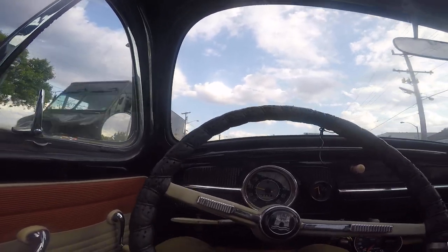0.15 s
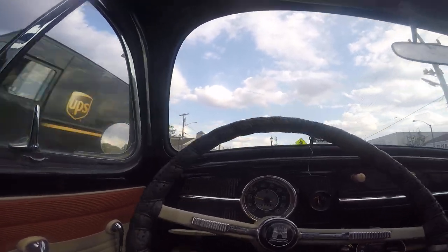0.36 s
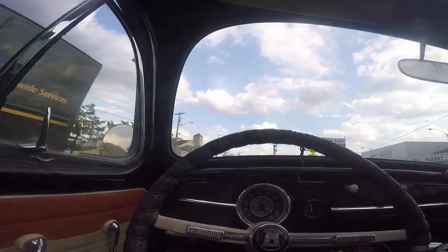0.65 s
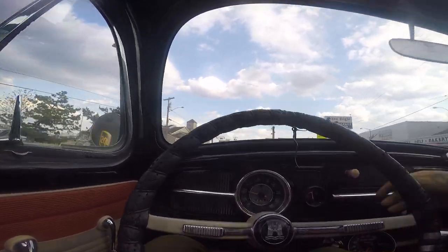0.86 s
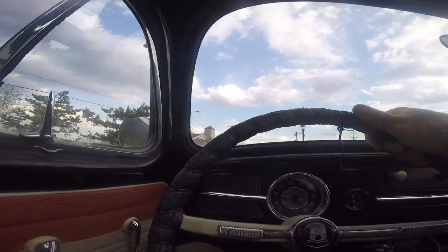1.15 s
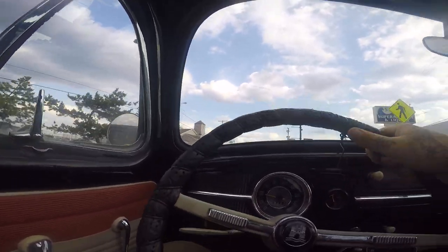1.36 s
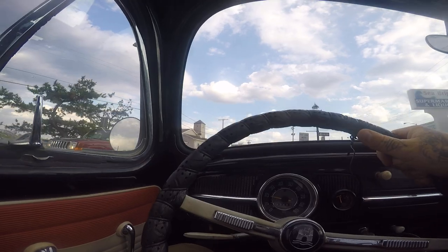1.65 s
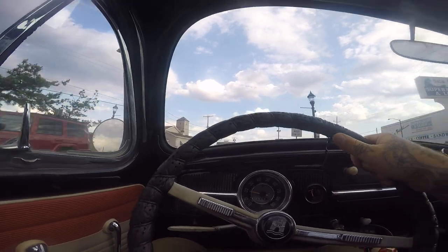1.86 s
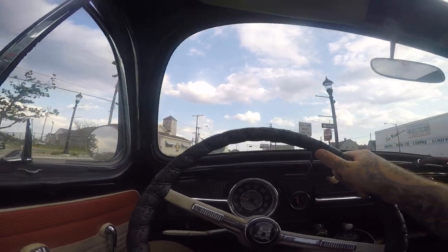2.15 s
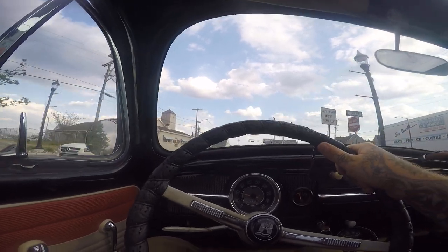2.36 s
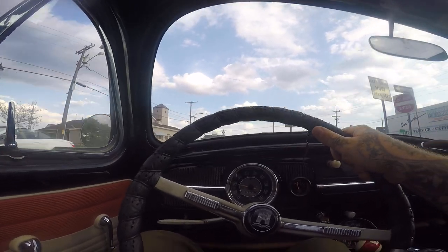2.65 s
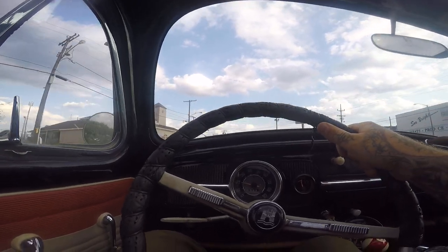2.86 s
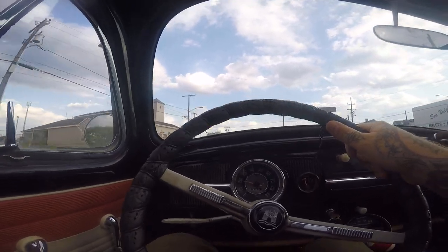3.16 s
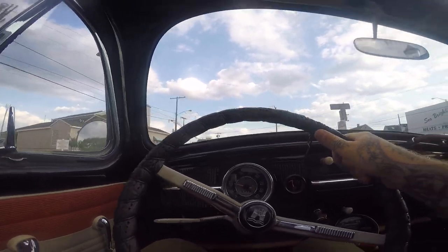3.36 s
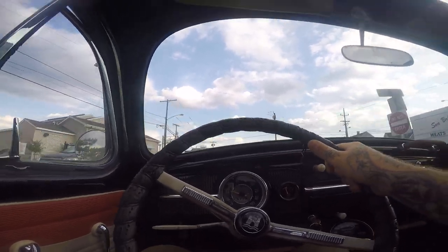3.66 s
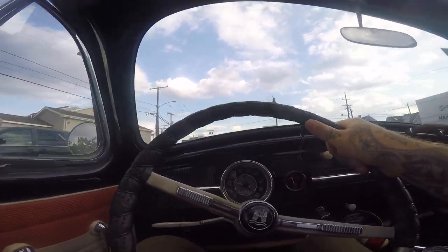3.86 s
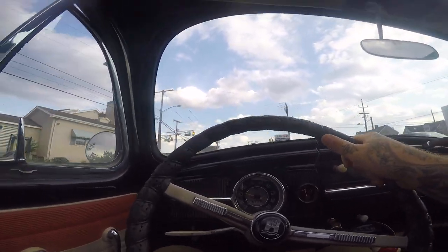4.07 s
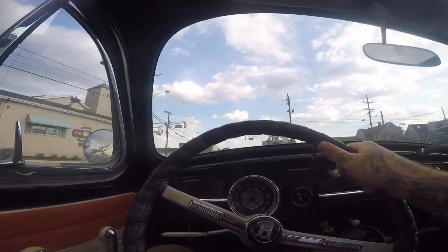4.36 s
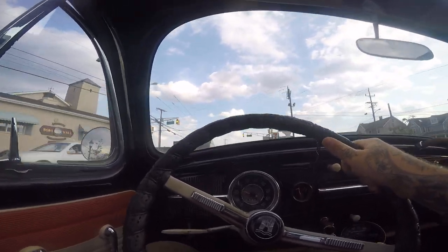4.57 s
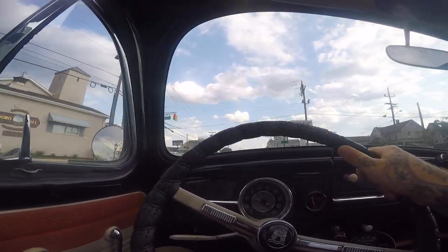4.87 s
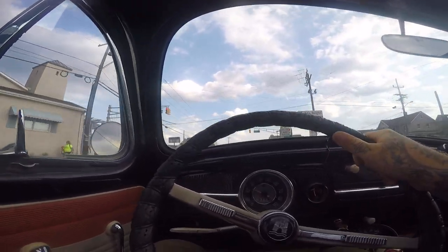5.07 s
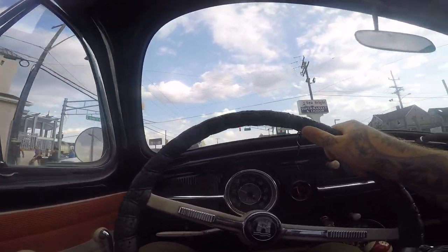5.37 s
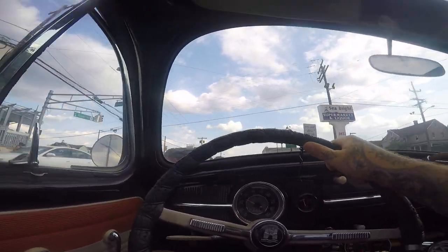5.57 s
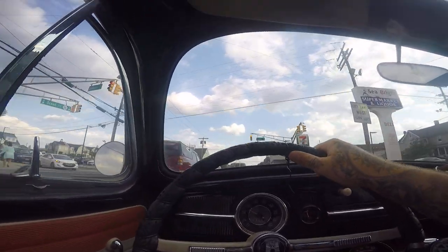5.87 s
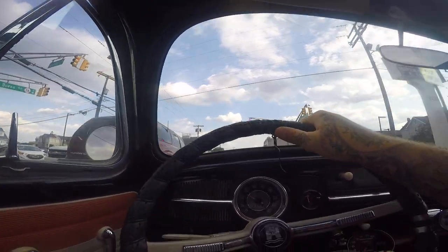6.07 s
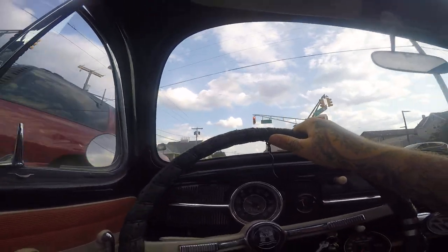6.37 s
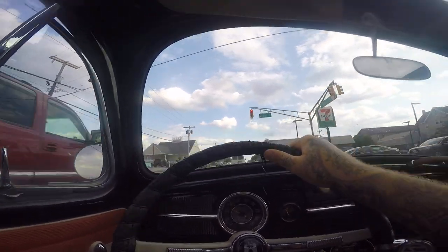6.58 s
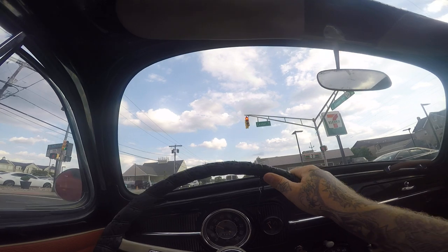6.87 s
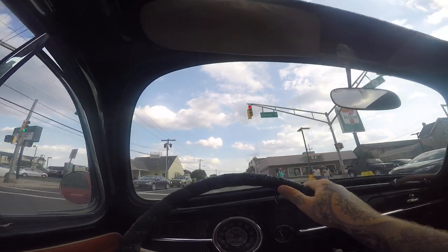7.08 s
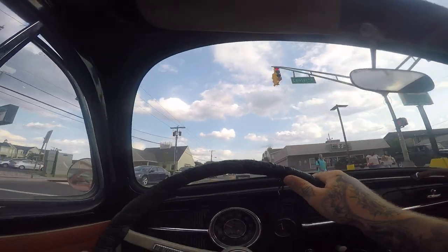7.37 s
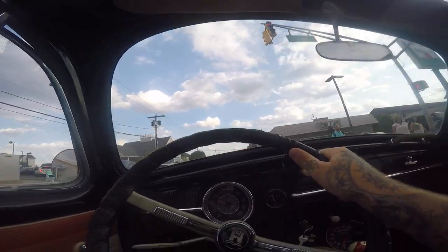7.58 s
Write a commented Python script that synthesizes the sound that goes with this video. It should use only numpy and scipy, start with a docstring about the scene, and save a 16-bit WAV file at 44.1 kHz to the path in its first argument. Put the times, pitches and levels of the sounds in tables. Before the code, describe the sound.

From inside the cabin of an old car driving down a street, a throbbing engine drops in pitch, then slowly gathers speed and eases off again. Tyre noise, a rushing fan and light valve ticking run underneath, while loose metal parts rattle here and there. Toward the end the car hits a rough patch, and the body knocks and clatters loudly over a swell of rumble.

```python
"""Inside an old air-cooled car

The revs of a flat-four engine sag, then it pulls gently along a street. Four unequal exhaust pulses
make a loping harmonic series that booms in the cabin's air resonances, over road rumble, fan rush,
valve ticks and gear whine. Impacts ring loose fittings and the body shell, dry friction squeals
thinly, and near the end a hard bump shakes the whole car."""
import sys
import numpy as np
from scipy import signal
from scipy.fft import rfft, irfft
from scipy.io import wavfile
from scipy.ndimage import uniform_filter1d

SR = 44100
rng = np.random.default_rng(int(sys.argv[2]) if len(sys.argv) > 2 else 0)


def digitize_waveform(pressure):
    """Quantize a signal to 16-bit integers and store it at the path in sys.argv[1].

    Rows of a 2-D input are taken as channels; values are limited to [-1, 1].
    """
    field = np.atleast_2d(pressure).T
    bounded = np.clip(field, -1, 1)
    quanta = np.round(bounded * 32767).astype(np.int16)
    wavfile.write(sys.argv[1], SR, quanta)


N = 340893
TIME = np.arange(N) / SR

# exhaust pulses in firing order: relative level/dB
PULSE_DB = [2.5, 4, -3, -16]
# cabin and panel resonances that colour fan and tyre noise: f/Hz, width/Hz, lift/dB
CABIN_MODES = [(376, 20, -3.5), (434, 50, 5), (691, 45, 5), (801, 125, 5), (947, 31, -6.5), (1418, 64, 7.5),
               (1785, 330, 10.5), (2293, 107, 6), (3550, 140, 2), (4484, 190, 5), (5510, 420, 7),
               (6660, 180, 8.5), (8020, 450, 5.5), (9800, 31, 11), (11500, 36, -2)]


def undb(db):
    """Amplitude ratio of a level in decibels."""
    return 10 ** (np.asarray(db) / 20)


def unit(x):
    """Normalisation to rms 1."""
    return x / np.sqrt(np.mean(x ** 2))


def curve(points):
    """Linear interpolation of (t/s, value) points at every sample."""
    return np.interp(TIME, *np.transpose(points))


def wander(rate):
    """Smooth random fluctuation of rms 1 that changes about rate times a second."""
    step = max(int(SR / rate), 2)
    stairs = np.repeat(rng.standard_normal(N // step + 1), step)
    return unit(uniform_filter1d(stairs, step)[:N])


def grains(rate, scatter_db):
    """Shot noise of rms 1: about rate impulses a second, of uneven size."""
    size = undb(scatter_db * (2 * rng.random(N) - 1)) * np.sign(rng.standard_normal(N))
    return unit(size * (rng.random(N) < rate / SR))


def burst(start, length, fade, rise=0.0012):
    """Envelope of a transient: linear rise, hold and exponential decay, all times in seconds."""
    out = np.zeros(N)
    near = slice(int(start * SR), int((start + length + 10 * fade) * SR))
    age = TIME[near] - start
    out[near] = np.minimum(age / rise, 1) * np.exp(-np.maximum(age - length, 0) / fade)
    return out


def oscillator(hz):
    """Sinusoid whose phase is the integral of its instantaneous frequency."""
    return np.sin(2 * np.pi * np.cumsum(hz) / SR)


def resonance(hz, centre_hz, width_hz, lift_db):
    """Lorentzian resonance: lift/dB and phase lag/rad relative to its centre."""
    detune = 2 * (hz - centre_hz) / width_hz
    return lift_db / (1 + detune ** 2), np.arctan(detune)


def colour(x, points, modes=(), size=8192):
    """Minimum-phase filter: resonances on a broad spectrum; white noise keeps its power."""
    f = np.maximum(np.arange(size // 2 + 1) * SR / size, 1)
    hz, db = np.transpose(points)
    octaves_outside = np.maximum(np.log2(f / hz[-1]), 0) + np.maximum(np.log2(hz[0] / f), 0)
    db = np.interp(np.log(f), np.log(hz), db) - 20 * octaves_outside
    for mode in modes:
        db = db + resonance(f, *mode)[0]
    cepstrum = irfft(np.log(undb(db)))[:size // 2]
    cepstrum[0] /= 2
    response = irfft(np.exp(2 * rfft(cepstrum, size)))
    return signal.fftconvolve(x, response / np.linalg.norm(response))[:N]


def ring(start, modes, tilt_db=0, rise=0.0028):
    """Free decay of damped modes after one blow, tilted by tilt_db per octave about 100 Hz."""
    out = np.zeros(N)
    near = slice(int(start * SR), int((start + .5) * SR))
    age = TIME[near] - start
    for hz, db, t60 in modes:
        envelope = (1 - np.exp(-age / rise)) * np.exp(-np.log(1000) * age / t60)
        out[near] += undb(db + tilt_db * np.log2(hz / 100)) * envelope * np.sin(2 * np.pi * hz * age)
    return out


def bump(start=6.89, hold=0.29, rise=0.18, fall=0.072):
    """Excitation, 0 to 1, as both axles cross a rough patch: exponential rise, hold and decay."""
    return np.exp(np.minimum(TIME - start, 0) / rise - np.maximum(TIME - start - hold, 0) / fall)


def road(rumble_lift_db, roar_db):
    """Random excitation by the road surface: the floor rumbles and the tyres roar grittily."""
    # floor rumble as the road's roughness varies: t/s, level/dB
    roughness = [(0, -25), (.55, -28), (.95, -29.5), (1.3, -31.5), (1.9, -30), (2.7, -27), (4.5, -26),
                 (4.9, -23.5), (5.3, -23.5), (5.6, -26), (5.85, -28.5), (6.25, -31.5), (6.6, -26.5),
                 (7.73, -27.5)]
    # spectra of floor and tyres: f/Hz, relative level/dB
    floor_spectrum = [(8, -1), (25, -3), (43, 3), (60, -3), (77, -8), (95, -9), (130, -17.5), (180, -12),
                      (240, -18), (300, -29.5), (600, -54.5)]
    tyre_spectrum = [(180, -14), (300, 6), (420, 3.5), (600, 2), (800, -3), (1060, 1.5), (1260, -12.5),
                     (1500, -17), (2500, -37.5)]
    rumble = unit(colour(rng.standard_normal(N), floor_spectrum))
    grit = rng.standard_normal(N) + 0.75 * grains(1400, scatter_db=7.6)
    roar = unit(colour(grit, tyre_spectrum, CABIN_MODES))
    return rumble * undb(curve(roughness) + rumble_lift_db) + roar * undb(roar_db + 1.2 * wander(20))


def fan_and_valves(cycle, tick_share=0.38, tick_decay=0.62, throb=0.047):
    """Amplitude-modulated noise: the cooling fan's rush with eight valve ticks in each cycle."""
    # spectrum of fan and valves: f/Hz, relative level/dB
    spectrum = [(1100, -8), (1450, -2.5), (2100, -0.5), (2750, 3), (3100, -3.5), (3700, 1.5), (4500, -5),
                (5000, -14.5), (6800, -15.5), (8600, -23.5), (10000, -22.5), (12500, -27), (15000, -27)]
    tick_phase = 2 * len(PULSE_DB) * cycle % 1  # two valves to a cylinder
    force = undb(3 * wander(130))
    ticks = unit(np.exp(-tick_phase / tick_decay) * force * rng.standard_normal(N))
    pulsation = 1 + throb * np.cos(2 * np.pi * (cycle - .15))
    rush = (rng.standard_normal(N) + tick_share * ticks) * pulsation
    return unit(colour(rush, spectrum, CABIN_MODES)) * undb(.5 * wander(14))


def gears(cycle, cycle_hz, mesh_order=48.5, level_db=-62.5, spread_hz=18):
    """Tooth meshing whines at a multiple of the cycle rate and swells in a panel resonance."""
    mesh_cycles = mesh_order * cycle + np.cumsum(spread_hz * wander(60)) / SR
    lift_db, _ = resonance(mesh_order * cycle_hz, centre_hz=835, width_hz=99, lift_db=12)
    return np.sqrt(2) * undb(level_db + lift_db + 2 * wander(25.93)) * np.sin(2 * np.pi * mesh_cycles)


def squeaks(squeal_spread_hz=120, chirp_spread_hz=500, sag_hz=150, sag_s=.06):
    """Dry friction of metal: thin squeals that sink in pitch, and a few quick chirps."""
    # squeals: t/s, settled f/Hz, level/dB, length/s
    squeals = [(0, 12200, -60, 0.055), (.18, 12330, -68, .055), (0.315, 12300, -65, .025),
               (.44, 12180, -66, .02), (.5, 12080, -64, .06), (1.03, 11740, -64, .1),
               (1.19, 11740, -69, .08), (1.32, 11740, -69, .04), (1.46, 11740, -75, .04)]
    # chirps: t/s, start f/Hz, end f/Hz, level/dB, length/s, fade/s
    chirps = [(.833, 10100, 9800, -64, .01, .012), (5.981, 13700, 13500, -62, .003, .004),
              (6.372, 13700, 13400, -55, .004, .004), (6.408, 12400, 12200, -58, .008, .008),
              (7.07, 11700, 11500, -41, 0.008, .012), (7.076, 10500, 10200, -42, 0.02, .014),
              (7.381, 13500, 12800, -53, .005, .004), (7.594, 13800, 13300, -56.5, 0.0046, .004)]
    drift = squeal_spread_hz * wander(1200)
    grip = undb(3 * wander(110))
    out = 0
    for t, hz, db, length in squeals:
        pitch = hz + drift + sag_hz * np.exp(-np.maximum(TIME - t, 0) / sag_s)
        out = out + undb(db) * burst(t, length, fade=.03, rise=.008) * grip * oscillator(pitch)
    waver = chirp_spread_hz * wander(2500)
    for t, start_hz, end_hz, db, length, fade in chirps:
        pitch = np.interp(TIME, [t, t + length], [start_hz, end_hz]) + waver
        out = out + undb(db) * burst(t, length, fade) * oscillator(pitch)
    return out


def door_buzz(fade=0.016, chatter_db=-6.5, ring_db=1):
    """Contact chatter: uneven impacts keep loose door fittings ringing and broaden their modes."""
    # buzzes: t/s, level/dB, length/s, tilt/(dB per octave), favoured f/Hz
    buzzes = [(0.239, -38.5, 0.019, -7, 950), (0.292, -37.5, 0.016, 0, 2250),
              (0.448, -41.5, 0.021, -4, 820), (0.552, -41.5, 0.035, -6, 1050), (0.751, -43, 0.021, -3, 820),
              (2.188, -40.5, 0.024, -5, 1834), (2.437, -38, 0.02, -5, 1900), (2.803, -42, 0.029, -7, 1834),
              (3.395, -38, 0.031, -7.5, 940), (3.703, -43, 0.028, -7, 1834), (3.786, -40.5, 0.021, -8, 830),
              (4.943, -36.5, 0.02, -1, 820), (6.729, -37, 0.014, 1, 950), (6.908, -39, 0.068, 3, 2690),
              (7.031, -31, 0.02, -5, 1834), (7.132, -31, 0.013, -5, 900), (7.206, -32, 0.037, -5, 1070)]
    # modes of the fittings: f/Hz, width/Hz, level/dB, delay/s
    modes = [(808, 63, -10, 0), (955, 59.4, -10.5, 0.005), (1047, 60, -14.5, 0.0063),
             (1834, 61, -4.5, 0.0035), (2220, 290, -14, 0.007), (2740, 87.7, -7, 0.0055),
             (3800, 190, -13, 0.006)]
    # spectrum of the contacts: f/Hz, relative level/dB
    spectrum = [(250, -33), (500, 2), (1000, 10), (1400, -2), (2500, 13), (4200, 0), (6000, -9),
                (14000, -31)]
    shakes = np.array([undb(db) * burst(t, length, fade) for t, db, length, _, _ in buzzes])
    tilt, focus_hz = np.transpose(buzzes)[-2:]
    out = undb(chatter_db) * colour(shakes.sum(axis=0) * grains(2500, scatter_db=9.6), spectrum)
    for hz, width, db, delay in modes:
        tone = oscillator(hz + width / 2 * wander(400)) * undb(ring_db + db + 3.3 * wander(300))
        lift_db, _ = resonance(hz, focus_hz, width_hz=110, lift_db=5.3)
        drive = undb(lift_db + tilt * np.log2(hz / 1400)) @ shakes
        out = out + tone * np.interp(TIME - delay, TIME, drive)
    return out


def clacks(contact_s=0.0037, relative_width=0.19, lift_db=21):
    """Single impacts of loose metal: a hard contact mostly cracks, a soft one mostly rings."""
    # strikes: t/s, level/dB, ringing f/Hz, hardness/(dB per octave)
    strikes = [(.25, -38.5, 1830, -3), (.293, -37.5, 2300, 0), (.297, -41, 3700, 2), (.309, -38, 2450, 2),
               (.445, -40, 830, -1), (.555, -41, 955, -3), (.624, -46, 3400, 2), (.644, -40, 2600, 0),
               (.744, -36, 850, -1), (.744, -37, 1830, -7), (.758, -45, 950, 0), (2.19, -34.5, 1846, -8),
               (2.204, -40, 910, -6), (2.44, -38, 1920, -1), (3.387, -42, 4000, 0),
               (3.402, -38.5, 1860, -6), (3.407, -43, 940, -9), (4.943, -31, 1824, -5),
               (4.952, -30, 1840, -8), (4.964, -37, 2774, -7), (4.966, -35, 984, -5), (6.729, -28, 786, -1),
               (6.729, -35, 1850, -3), (6.741, -34, 950, 2), (6.908, -30, 2620, 0), (6.935, -25.5, 940, 1),
               (6.958, -32, 1834, -5), (7.086, -34, 3700, -2), (7.104, -29, 3620, 0), (7.114, -29, 2300, 0),
               (7.145, -29, 920, -1), (7.214, -30, 1800, -1), (7.217, -29, 1074, -5),
               (7.229, -30, 1060, 0.5)]
    # spectrum of the crack: f/Hz, relative level/dB
    spectrum = [(300, -3), (700, 1), (2500, -3), (4300, -1.5), (6000, -10), (14000, -30)]
    out = np.zeros(N)
    for t, db, hz, hardness in strikes:
        near = slice(int(t * SR), int(t * SR) + SR // 10)
        contact = burst(t, contact_s, fade=0.0082)[near]
        noise = contact * rng.standard_normal(len(contact))
        tilted = [(f, level + hardness * np.log2(max(f / hz, 1))) for f, level in spectrum]
        crack = colour(noise, tilted, [(hz, relative_width * hz, lift_db)])[:len(contact)]
        tone = burst(t, contact_s, fade=.007)[near] * np.sin(2 * np.pi * hz * (TIME[near] - t))
        clack = unit(crack) + undb(-7 - 2.2 * hardness) * unit(tone)
        out[near] += undb(db) * clack * np.linalg.norm(contact) / np.linalg.norm(clack)
    return out


def clatter():
    """Shot noise from jolted metal parts: dense dull impacts and a sharper scrape."""
    # jolts: t/s, base level/dB, length/s, brightness (shifts the balance towards the scrape)
    jolts = [(0.291, -35, 0.017, 0.5), (0.359, -38.5, 0.024, 1), (0.615, -39, 0.035, 2),
             (3.386, -44, 0.018, 3.1), (6.843, -33, 0.045, 2), (6.892, -28.5, 0.051, 1),
             (6.9, -35, 0.008, 3.5), (6.945, -28.5, 0.03, 3.5), (6.985, -44, 0.077, 3.5),
             (7.072, -36.5, 0.019, 4.5), (7.101, -30.5, 0.048, 2), (7.135, -40, .005, 1),
             (7.158, -30, 0.022, 3), (7.544, -38.5, 0.022, 1.5)]
    # spectra of impacts and scrape: f/Hz, relative level/dB
    dull_spectrum = [(250, -8), (500, 11.5), (1000, 6.5), (1300, 2), (1800, 7), (2600, 6.5), (4000, -2),
                     (5500, -13), (8000, -18), (11000, -28.5), (15000, -32)]
    scrape_spectrum = [(2000, 4.5), (4000, 9), (6000, 4.0), (9000, -6.0), (15000, -20)]
    dull = sharp = 0
    for t, db, length, bright in jolts:
        dull = dull + undb(db - 1.9 * bright) * burst(t, length, fade=0.0044)
        sharp = sharp + undb(db + 4.3 * bright - 18) * burst(t, length, fade=0.007)
    scrape = colour(sharp * grains(9000, scatter_db=2.8), scrape_spectrum)
    return colour(dull * grains(4000, scatter_db=2.3), dull_spectrum) + scrape


def knocks(focus_width_hz=27, focus_db=5):
    """Impulse response: blows from the wheels ring the body shell; a loose part clonks."""
    # blows through the suspension: t/s, level/dB, hardness/(dB per octave), favoured f/Hz
    blows = [(0.798, -33, -6, 69), (2.821, -31, -1, 69), (3.42, -28, -5, 69), (4.221, -24.5, 2.5, 177),
             (4.86, -26.5, -7.5, 43), (5.07, -26, -2.5, 143), (6.771, -26, -7.5, 43),
             (6.822, -23, -5.5, 43), (6.871, -20.5, -0.5, 143), (6.896, -14.5, 3.5, 178),
             (6.924, -16, 5, 69), (6.931, -26.5, -1, 178), (7.1, -33, -11, 69), (7.134, -23, -8, 69),
             (7.662, -34.5, -11.5, 43)]
    # strikes and rebounds of the loose part: t/s, level/dB
    clonks = [(.295, -20.5), (.306, -25), (5.052, -29), (6.803, -22)]
    # modes of the shell and of the loose part: f/Hz, level/dB, T60/s
    shell_modes = [(42.7, -1, 0.43), (64.7, -1.5, 0.085), (141.7, 0, 0.14), (179, -6.5, 0.095),
                   (378, -11.5, 0.11)]
    part_modes = [(469, -1.5, 0.059), (540, -1.5, 0.043)]
    out = sum(undb(db) * ring(t, part_modes) for t, db in clonks)
    for t, db, hardness, focus_hz in blows:
        modes = [(hz, level + resonance(hz, focus_hz, focus_width_hz, focus_db)[0], t60)
                 for hz, level, t60 in shell_modes]
        out = out + undb(db) * ring(t, modes, hardness)
    return out


def exhaust(cycle, cycle_hz, load, level_db=0.2, overrun_db=4.5, overrun_hz_per_s=9.1):
    """Fourier series phased by four unequal pulses; cabin resonances boom as harmonics sweep past."""
    # harmonics of the cycle rate: order, pulling level/dB, coasting level/dB
    harmonics = [(1, -44, -47), (2, -39, -35.5), (3, -33.5, -49.5), (4, -35, -35), (5, -37.5, -51),
                 (6, -44, -44.5), (7, -40, -49.5), (8, -49, -47.5), (9, -46, -58), (10, -51, -58),
                 (11, -51.5, -86), (12, -40.5, -51.5), (13, -42.5, -64), (14, -64, -57), (15, -51, -84),
                 (16, -61, -63.5), (17, -61.5, -57), (18, -73, -68)]
    # air resonances of the cabin: f/Hz, width/Hz, lift/dB
    air_modes = [(38.93, 2.7, 8), (56.5, 6.5, 2), (74.7, 9.4, 2.5), (170.2, 17.8, 8.5), (186.3, 28.6, 11),
                 (226, 13.7, -2), (256, 14.3, 7)]
    start_cycles = 0.1646  # where the engine's lope starts within its cycle
    firings = np.arange(len(PULSE_DB)) / len(PULSE_DB)
    angle = 2 * np.pi * (cycle + start_cycles + 0.00062 * wander(40))
    overrun = np.clip(-np.gradient(cycle_hz) * SR / overrun_hz_per_s, 0, 1)
    out = 0
    for order, pull_db, coast_db in harmonics:
        phase = np.angle(np.exp(-2j * np.pi * order * firings) @ undb(PULSE_DB))
        phase -= 0.0341 * order ** 2  # dispersion: the body passes higher harmonics later
        db = level_db + load * pull_db + (1 - load) * coast_db + 0.6 * wander(7)
        if order == len(PULSE_DB):  # the firing note swells while the revs fall
            db = db + overrun_db * overrun
        for mode in air_modes:
            lift_db, lag = resonance(order * cycle_hz, *mode)
            db, phase = db + lift_db, phase - lag
        out = out + np.sqrt(2) * undb(db) * np.cos(order * angle + phase)
    return out * undb(0.65 * wander(60))  # no two firings burn alike


def scene(fan_db=-0.1, roar_load_db=1, bump_rush_db=7.5, bump_rumble_db=8):
    """Superposition of engine, rattles and road at the driver's seat."""
    # rate of the four-stroke cycle: t/s, f/Hz
    speed = [(0, 21.6), (.18, 21.8), (.45, 18.5), (.8, 15.55), (.95, 14.65), (1.1, 16.05), (1.45, 15.79),
             (1.9, 15.9), (2.4, 16.2), (2.8, 16.65), (3.2, 16.97), (4, 17.85), (5.65, 19.81), (6.6, 19.42),
             (7.73, 19.2)]
    # throttle: t/s, load (0 coasting, 1 pulling)
    throttle = [(0, 0.6), (.3, 0.0033), (.45, 0), (1.12, 0.04), (1.35, 0.49), (3, 0.94), (4.3, 0.92),
                (5.35, 0.57), (6, 0.2), (7.73, 0.3)]
    # rush shared by fan and tyres: t/s, level/dB
    rush = [(0, -41), (.55, -43.5), (.95, -47), (1.6, -47.5), (2.7, -44.5), (4.4, -43), (5.5, -40.5),
            (6.05, -43), (6.5, -41.5), (7.73, -42)]
    cycle_hz, load, shake = curve(speed), curve(throttle), bump()
    cycle = np.cumsum(cycle_hz) / SR
    rush_db = curve(rush) + bump_rush_db * shake
    engine = exhaust(cycle, cycle_hz, load)
    engine += fan_and_valves(cycle) * undb(rush_db + fan_db) + gears(cycle, cycle_hz)
    rattles = door_buzz() + clacks() + clatter() + knocks() + squeaks()
    rolling = road(bump_rumble_db * shake, rush_db + roar_load_db * load)
    return (engine + rolling + rattles)[None]


def record(dry, cutoff_hz=15200):
    """Band limiting: a steep elliptic low-pass removes the highest treble."""
    return signal.sosfilt(signal.ellip(10, .2, 80, cutoff_hz, fs=SR, output="sos"), dry)


dry = scene()
out = record(dry)
digitize_waveform(out)
```